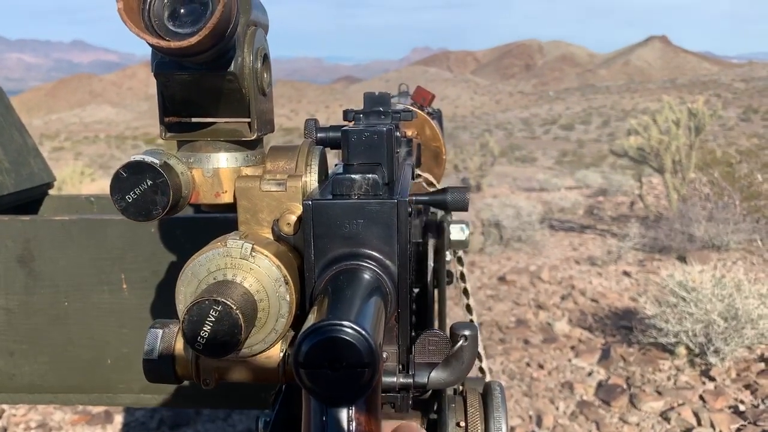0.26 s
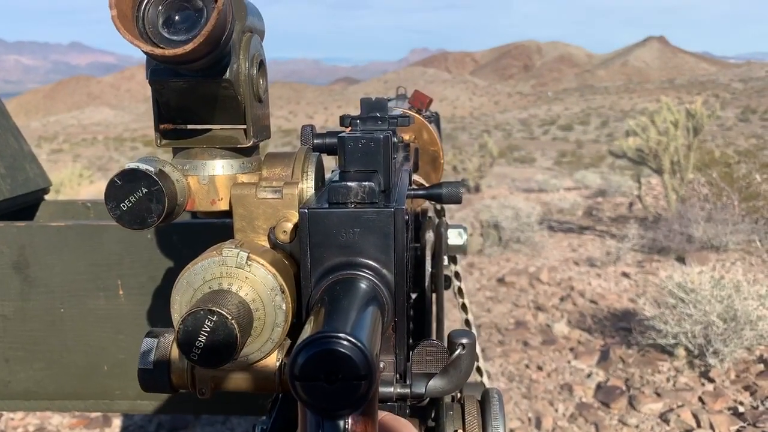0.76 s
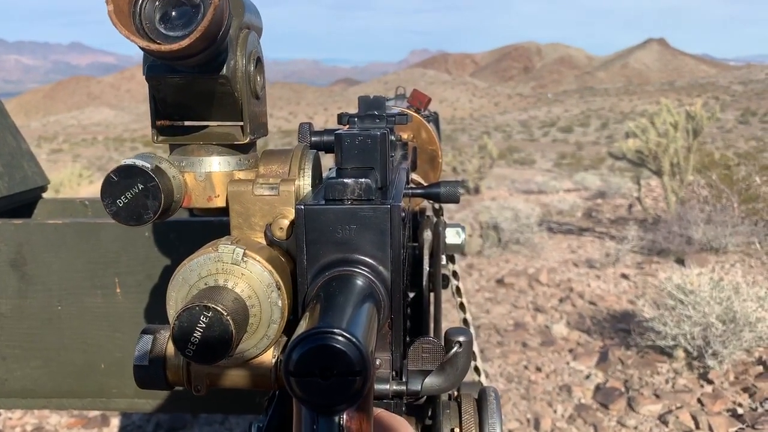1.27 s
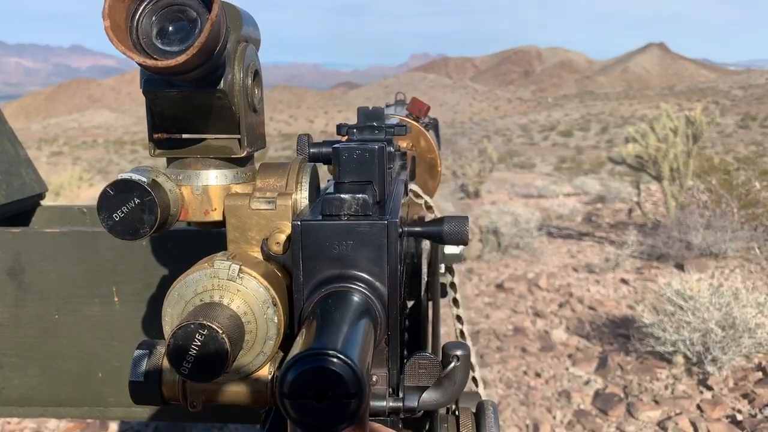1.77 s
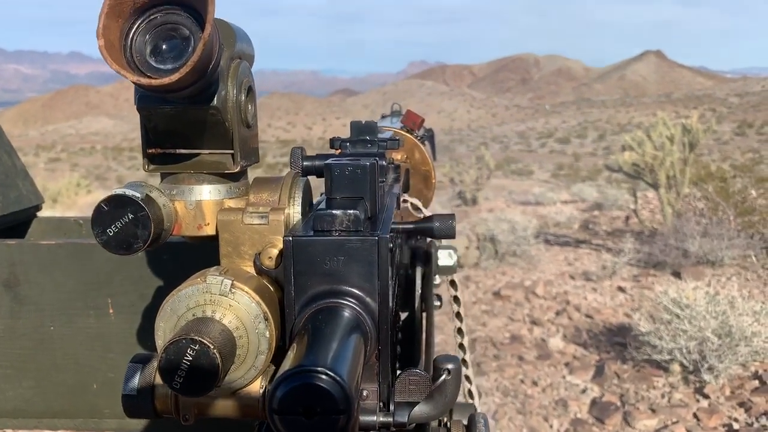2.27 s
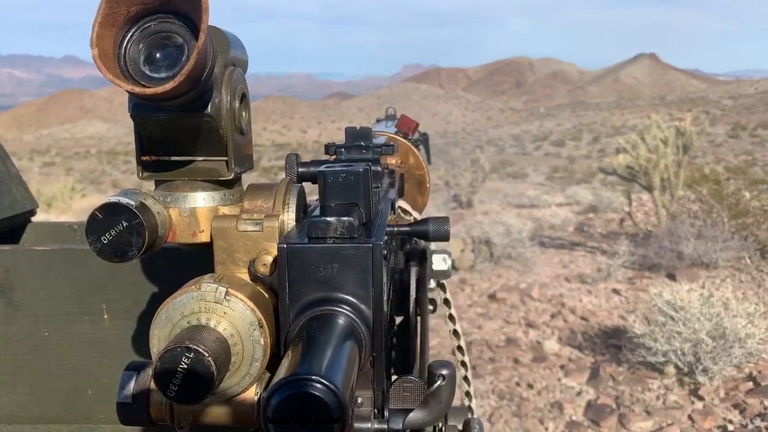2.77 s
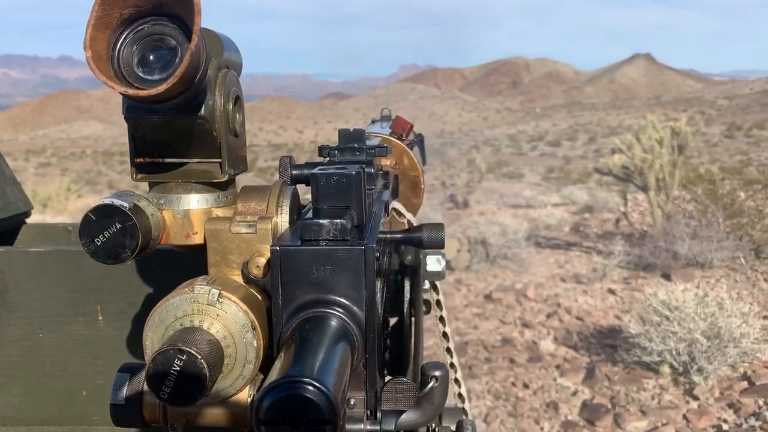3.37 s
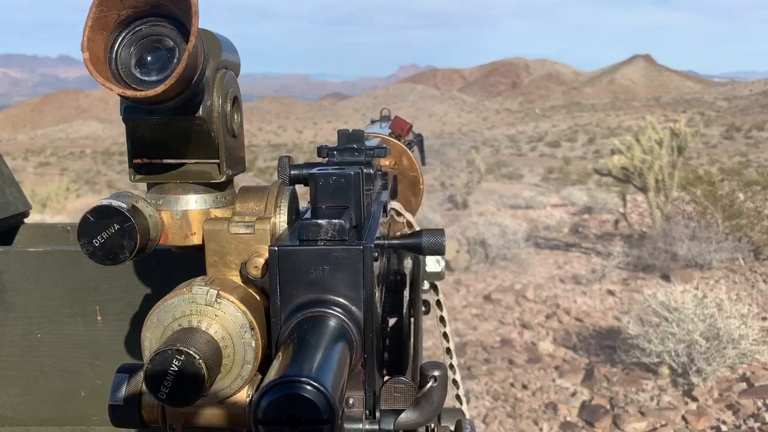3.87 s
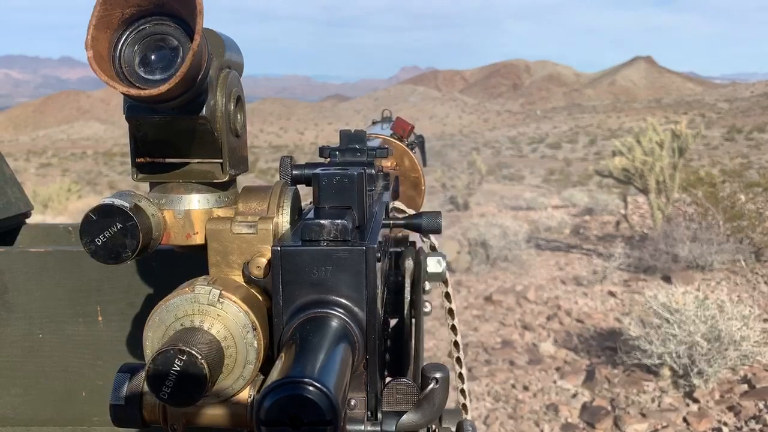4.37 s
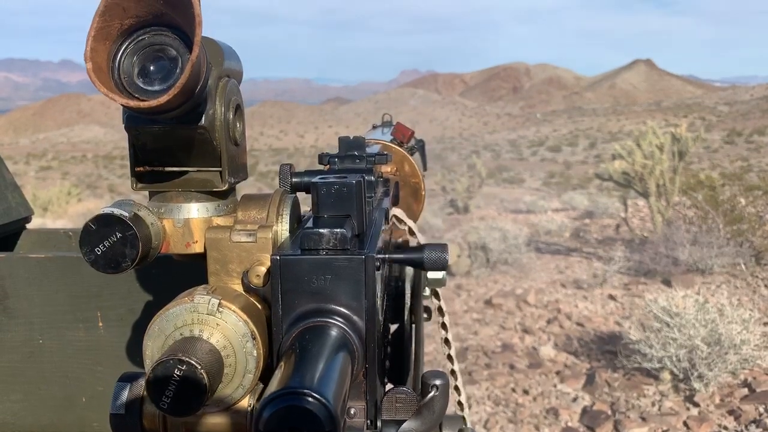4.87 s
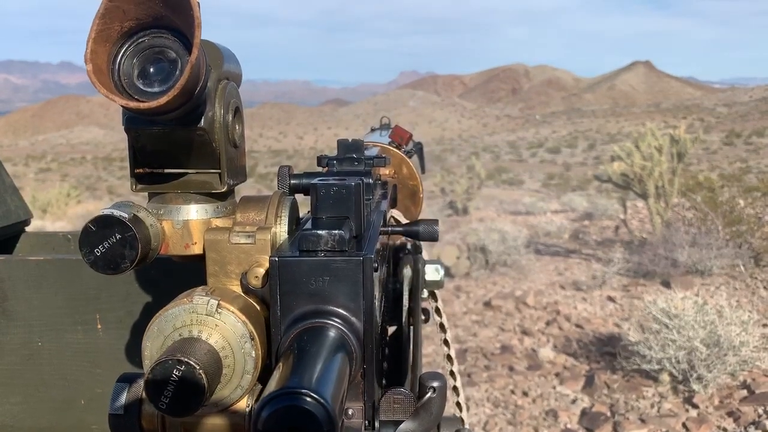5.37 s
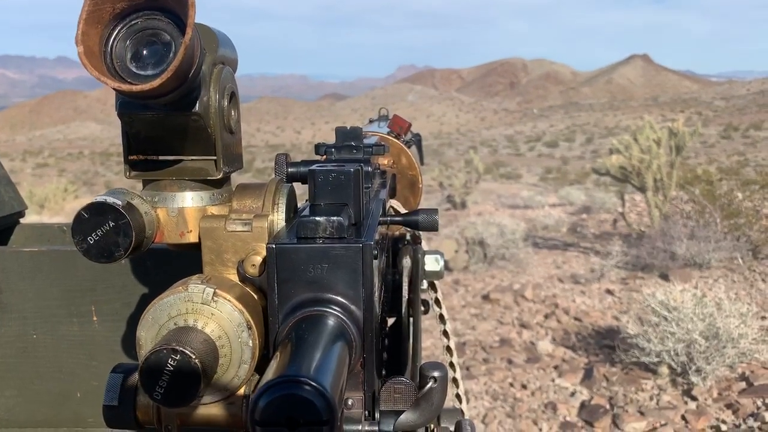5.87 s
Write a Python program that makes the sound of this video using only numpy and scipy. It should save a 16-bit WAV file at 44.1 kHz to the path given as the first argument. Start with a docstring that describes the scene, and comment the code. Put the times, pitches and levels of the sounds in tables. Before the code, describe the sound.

Right behind the breech of a belt-fed machine gun in open desert. The last shots of a short burst crack out, the bolt clacks home, and brass cases tick and ring on stones with dull knocks. Then a long steady burst of about seven shots a second hammers on with metallic action clatter and low air thumps, ending in a bolt clack, tinkling brass and a draining murmur from the hills. Close stereo microphones, peaks slightly squashed.

```python
"""Open desert, just behind the breech of a belt-fed machine gun on a mount, which fires two bursts.
Each blast is a set of dying tones and scattered noise coming back off the same surroundings.
The action clatters as shaped noise, low puffs of sinking pitch shake the microphones, and the hills murmur
back as patchy noise. Brass cases tick and ring on the stones, the bolt runs home unfired after each burst,
and dull knocks come from near the mount."""
import sys
import numpy as np
from scipy import signal
from scipy.fft import rfft, irfft, next_fast_len
from scipy.io import wavfile
from scipy.ndimage import uniform_filter1d

SR = 44100
rng = np.random.default_rng(int(sys.argv[2]) if len(sys.argv) > 2 else 0)


def magnitude_from_level(level_db):
    """Linear magnitude for a level in decibels (20 dB per decade)."""
    exponent = np.asarray(level_db, float) / 20
    return 10 ** exponent


def unload_wav(signal):
    """Save mono or channel-first audio to the path in sys.argv[1] as 16-bit WAV at rate SR, clipped to [-1, 1]."""
    wavfile.write(
        sys.argv[1],
        SR,
        np.round(np.clip(np.atleast_2d(signal).T, -1, 1) * 32767).astype(np.int16),
    )


N = 269886  # length in samples


def unit(x):
    """Scales a sound to rms 1."""
    return x / np.sqrt(np.mean(x ** 2) + 1e-20)


def along(points, hz):
    """Reads a curve of (Hz, value) points on a logarithmic pitch axis."""
    f, v = np.transpose(points)
    return np.interp(np.log(hz + 1), np.log(f + 1), v)


def filtered(x, response):
    """Multiplies the spectrum of x by a response that depends on frequency."""
    m = next_fast_len(x.shape[-1] + 8192)
    spectrum = rfft(x, m) * response(np.fft.rfftfreq(m, 1 / SR))
    return irfft(spectrum, m)[..., :x.shape[-1]]


# How alike noise is on the left and right. Each row: pitch in Hz, likeness from 0 (unrelated) to 1 (same).
LIKENESS = [(60, 0.98), (130, 0.032), (300, .65), (700, 0.062), (2000, .55), (3000, 0), (8000, 0.067)]


def hiss(count, tone):
    """Makes stereo noise of rms 1 with a given tone; the likeness of its two sides depends on pitch."""
    def turn(hz):
        return np.arccos(np.clip(along(LIKENESS, hz), 0, 1)) / 2

    def mid_and_side(hz):
        return magnitude_from_level(along(tone, hz)) * [np.cos(turn(hz)), np.sin(turn(hz))]

    mid, side = filtered(rng.standard_normal((2, count)), mid_and_side)
    return unit(np.array([mid + side, mid - side]))


def patchy(x, depth_db, size):
    """Makes the level of x uneven in random patches of time and frequency."""
    z = signal.stft(x, nperseg=size)[2]
    field = uniform_filter1d(rng.standard_normal(z.shape[1:]), size=5, axis=0)
    field = uniform_filter1d(field, size=8, axis=1)
    return signal.istft(z * magnitude_from_level(depth_db * unit(field)), nperseg=size)[1][:, :x.shape[1]]


def add(out, s, sound):
    """Mixes a sound in at second s; the buffer starts one second early."""
    at = round((s + 1) * SR)
    out[:, at:at + sound.shape[-1]] += sound


def silence():
    """Gives an empty stereo buffer with a second to spare at both ends."""
    return np.zeros((2, N + 2 * SR))


def sides(pan_db):
    """Gives left and right gains; a positive pan makes the left louder."""
    return magnitude_from_level([[pan_db / 2], [-pan_db / 2]])


def ring(t, hz, t60, attack):
    """Makes a sine from t = 0 that swells over the attack (s) and dies by 60 dB in t60 (s)."""
    t = np.maximum(t, 0)
    return magnitude_from_level(-60 * t / t60) * (1 - np.exp(-t / attack)) * np.sin(2 * np.pi * hz * t)


def scatter(tone, t60):
    """Makes dense returns as noise in which every frequency dies at its own speed."""
    hz, t, z = signal.stft(hiss(SR // 2, tone), SR, nperseg=256)
    fade = magnitude_from_level(-60 * t / along(t60, hz)[:, None])
    return signal.istft(z * fade, SR, nperseg=256)[1][:, :SR // 2]


# The shots. Each row: start in seconds, blast level in dB, base level in dB of the shot's low puffs.
SHOTS = [(-.0615, -10.5, -30), (0.0851, -12, -30.5), (0.2295, -13, -28.5), (1.5064, -11, -26),
         (1.6512, -12, -31.5), (1.7976, -12, -34), (1.9465, -11.5, -27), (2.0925, -12, -28),
         (2.2436, -11.5, -24), (2.3892, -12, -31.5), (2.535, -11.5, -38), (2.6779, -11.5, -30),
         (2.8244, -11.5, -29.5), (2.9757, -12, -28), (3.123, -11.5, -29), (3.2685, -12, -37.5),
         (3.4188, -12, -29.5), (3.5656, -12, -32.5), (3.7133, -11.5, -38.5), (3.8655, -12, -28),
         (4.014, -12, -28), (4.1639, -11, -30), (4.305, -12.5, -28), (4.451, -12, -35.5),
         (4.5985, -12, -32.5), (4.7443, -12, -30.5), (4.891, -12, -28), (5.038, -12.5, -26.5)]
# The blast and its strong returns from things nearby. Each row: delay after firing in seconds, pitch in Hz,
# time to die by 60 dB in seconds, middle level in dB relative to the blast level, left over right in dB.
RETURNS = [(.0005, 1500, 0.011, 3, 1.5), (.0012, 922, .0053, 19.5, -0.5), (.0022, 1182, 0.0079, 2, 3),
           (.0024, 2050, .0063, 16.5, -.8), (.0036, 358.5, 0.0097, 6, 0), (.004, 1615, 0.014, 3.5, 4),
           (.0098, 858.5, 0.013, 5.5, 8), (.0126, 1500, 0.0094, .7, 6), (.0151, 490, 0.038, -0.5, -5),
           (.0167, 780, .021, -5, 6.5), (.0311, 679, .038, -14, -10.5), (.0416, 604, .026, -17, -9),
           (.0518, 216, 0.033, -14, -3.5), (.079, 883, .032, -29.5, 8), (.0863, 332, 0.033, -22.5, 1.1)]
# Tone of the returns scattered close by. Each row: pitch in Hz, relative level in dB.
NEAR_TONE = [(100, -24), (200, -0.5), (500, -6.5), (1000, -0.5), (2200, -6.5), (4500, -13), (7000, -27),
             (12000, -23.5)]
# How long they last. Each row: pitch in Hz, time to die by 60 dB in seconds.
NEAR_T60 = [(150, 0.12), (1000, 0.13), (5000, 0.13)]
# Tone of the returns scattered by the open ground. Each row: pitch in Hz, relative level in dB.
GROUND_TONE = [(100, -13), (250, -2.5), (500, 5.5), (800, -1), (1200, -8.5), (1800, -18.5), (5000, -29),
               (10000, -45)]
# How long they last. Each row: pitch in Hz, time to die by 60 dB in seconds.
GROUND_T60 = [(150, 0.16), (500, 0.29), (2000, 0.11)]


def blasts():
    """The surroundings do not move, so every shot returns in nearly the same shape; return levels and part
    of the close scattered noise differ from shot to shot."""
    out, t = silence(), np.arange(SR // 2) / SR
    rise = 1 - np.exp(-t / .0012)
    fixed = magnitude_from_level(-5.5) * scatter(NEAR_TONE, NEAR_T60) + magnitude_from_level(-21) * scatter(GROUND_TONE, GROUND_T60)

    # weaker, later returns at random pitches and sides that stay fixed, with levels that vary from shot to shot
    from_s, to_s, low_hz, high_hz, late_t60 = .04, .125, 277, 1000, 0.046
    late_db, fall_db_per_s, dull_db_per_octave, pan_spread_db = -22.5, 171, 7.5, 7
    after = np.linspace(0, to_s - from_s, num=24)
    octaves = rng.permutation(np.linspace(0, np.log2(high_hz / low_hz), num=24))
    late = []
    for s, up in zip(after, octaves):
        level = late_db - fall_db_per_s * s - dull_db_per_octave * up
        late.append((from_s + s, low_hz * 2 ** up, late_t60, level, rng.normal(0, pan_spread_db)))

    for s, db, _ in SHOTS:
        strong = 0
        for delay, hz, t60, level, pan in RETURNS + late:
            varied_db = level + rng.normal(0, 1.2 + 40 * delay)  # later returns vary more
            strong = strong + sides(pan) * magnitude_from_level(varied_db) * ring(t[:SR // 4] - delay, hz, t60, attack=0.00073)
        fresh_scatter = magnitude_from_level(-7.0) * scatter(NEAR_TONE, NEAR_T60)
        add(out, s, magnitude_from_level(db) * strong)
        add(out, s, magnitude_from_level(db) * rise * (fixed + fresh_scatter))
    return out


def cycle(t, return_s):
    """Gives the gain of the action's noise, relative to the blast level, t seconds after firing."""
    lead_in_db, lead_in_db_per_s = -5.5, 1999
    roar_db, roar_sag_db_per_s, roar_s, roar_fall_db_per_s = -1, 191, .013, 1052
    dreg_db, dreg_fall_db_per_s, idle_db = -10.5, 480, -47
    return_db, return_rise_db_per_s, return_fall_db_per_s = -30, 520, 1801
    sagging = roar_db - roar_sag_db_per_s * t
    falling = roar_db - roar_sag_db_per_s * roar_s - roar_fall_db_per_s * (t - roar_s)
    roar = magnitude_from_level(np.minimum(sagging, falling))  # the gas
    dreg = (t > roar_s) * magnitude_from_level(dreg_db - dreg_fall_db_per_s * t)
    home = magnitude_from_level(return_db - np.maximum(return_rise_db_per_s * (return_s - t), return_fall_db_per_s * (t - return_s)))
    idle = (t < return_s) * magnitude_from_level(idle_db)
    after = np.sqrt(roar ** 2 + dreg ** 2 + home ** 2 + idle ** 2)
    return np.where(t < 0, magnitude_from_level(lead_in_db + lead_in_db_per_s * t), after)


# Tone of the clatter. Each row: pitch in Hz, relative level in dB.
ACTION_TONE = [(200, -13.5), (600, 0), (2000, 0), (4000, 0), (6000, -4), (9000, -6.5), (13000, -9),
               (15700, -13.5)]
# Ticks of the belt pawl. Each row: time after firing in seconds, middle level in dB.
FEED_TICKS = [(.077, -51.5), (.089, -49.5), (.097, -50.5), (.124, -52)]


def action():
    """Fresh clatter each cycle: a short swell of noise before the shot, gas, the bolt's knock at the back,
    the belt feed, the rattle of the bolt's return."""
    lead_in_s, return_s = .026, .14
    back_s, back_db, back_spread_db, back_t60 = .034, -23.5, 0.5, 0.024  # the knock at the back
    out, t, before = silence(), np.arange(-lead_in_s, return_s + .012, 1 / SR), -.2
    for s, db, _ in SHOTS:
        weaker = (s - before > .3) & (t < -.0045)  # the swell is weaker at the start of a burst
        late = t - back_s - rng.normal(0, 0.0014)
        knock = (late > 0) * magnitude_from_level(rng.normal(back_db, back_spread_db) - 60 * np.abs(late) / back_t60)
        shape = magnitude_from_level(db - 6.2 * weaker) * cycle(t, return_s) + knock
        contacts = unit(uniform_filter1d(rng.standard_normal(len(t)), size=110))
        rattle = magnitude_from_level(2.1 * contacts)  # many small contacts
        feed = 0
        for at, tick_db in FEED_TICKS:
            feed = feed + (t > at) * magnitude_from_level(tick_db + rng.normal(0, 2.1) - 60 * np.abs(t - at) / 0.033)
        pawl = feed * hiss(len(t), [(1500, -22.0), (3200, 4), (4600, 2.5), (6500, -25.0)])
        clatter = patchy(hiss(len(t), ACTION_TONE), depth_db=2.0, size=128)
        add(out, s - lead_in_s, shape * rattle * clatter + pawl)
        before = s
    return out


def lump(hz, halves_s, rise_s, fall_s):
    """A round lump of air, peak at .04 s, whose pitch halves every halves_s; one port gets it first."""
    port_lag_s = .0004  # typical size
    t = np.arange(-.04, .05, 1 / SR) + rng.normal(0, port_lag_s) * np.array([[1], [-1]])
    cycles = hz * rng.uniform(0.85, 1.12) * halves_s / np.log(2) * (1 - 2 ** (-t / halves_s))
    swell = np.exp(-(t / np.where(t < 0, rise_s, fall_s)) ** 2)
    return rng.choice([-1, 1]) * sides(rng.normal(0, 2.8)) * swell * np.cos(2 * np.pi * cycles)


# Later low puffs. Each row: time of the peak in seconds, peak level in dB.
LATER_PUFFS = [(.009, -30), (.054, -30.5), (1.576, -30), (1.707, -24), (1.756, -37), (1.847, -27),
               (2.014, -28), (2.148, -25.5), (2.315, -25.5), (2.369, -26), (2.462, -21.5), (2.582, -31.5),
               (3.046, -23.5), (3.098, -27), (3.941, -23), (3.997, -26.5), (4.665, -30), (4.808, -23.5),
               (4.945, -23.5), (5.112, -22.5), (5.163, -28.5)]
# Tone of the ragged puffs. Each row: pitch in Hz, relative level in dB.
PUFF_TONE = [(25, -23.5), (50, -3), (80, 1.5), (130, -3.5), (200, -12), (350, -44.5)]


def puffs():
    """Low lumps of air on the microphones: a ragged and a round one with each shot, and round ones later."""
    out, count = silence(), round(.036 * SR)
    ragged_db, thump_db, thump_s = -4, 6, .014  # both levels relative to the shot's base puff level
    for s, _, db in SHOTS:
        ragged = unit(np.hanning(count) * hiss(count + SR // 10, PUFF_TONE)[:, -count:])
        add(out, s + 0.0014, magnitude_from_level(db + ragged_db) * ragged)
        thump = lump(hz=122, halves_s=0.011, rise_s=.007, fall_s=0.014)
        add(out, s + thump_s - .04, magnitude_from_level(db + thump_db) * thump)
    for s, db in LATER_PUFFS:
        add(out, s - .04, magnitude_from_level(db) * lump(hz=74, halves_s=0.015, rise_s=0.0087, fall_s=0.019))
    return out


# Tone of the body of the murmur. Each row: pitch in Hz, relative level in dB.
HILL_BODY = [(15, -34), (30, -20.5), (60, -6.5), (110, -5.5), (280, -7.5), (400, -14), (600, -18),
             (900, -22), (1300, -18), (1650, -18.5), (1900, -11.5), (2200, -17), (2900, -19), (4500, -42.5),
             (7000, -72)]
# Tone of its treble, which drops fast. Each row: pitch in Hz, relative level in dB.
HILL_TREBLE = [(1500, -16), (3000, -2), (4500, 1), (6500, -5), (9000, -15.5), (11500, -31.5)]
# Tone of the treble that lingers. Each row: pitch in Hz, relative level in dB.
HILL_LAST = [(1500, -16), (3000, -0.5), (4200, 0.5), (5000, -11.5), (7500, -18.5), (9000, -32)]


def hills():
    """A patchy murmur of noise in three layers that drains away after each shot, the treble first."""
    now, fired = np.arange(N) / SR, np.array(SHOTS)[:, 0]
    since = now - fired[np.searchsorted(fired + .05, now) - 1]  # seconds since the last shot whose echo is back
    murmur = 0
    # level in dB at since = 0, drain in dB per second, tone
    for db, drain, tone in [(-57, 7.5, HILL_BODY), (-64.5, 48.5, HILL_TREBLE), (-69, 13.5, HILL_LAST)]:
        murmur = murmur + magnitude_from_level(db - drain * since) * hiss(N, tone)
    return patchy(murmur, depth_db=2.0, size=512)


# Cases striking stone. Each row: start in seconds, tick level in dB, ring pitch in Hz, ring level in dB.
CASES = [(.4459, -48.5, 13200, -64.5), (.4997, -56.5, 13000, -65), (.601, -43.5, 12950, -52.5),
         (.615, -41, 13000, -44), (.7427, -59, 13350, -68.5), (.8272, -56, 12800, -54.5),
         (.841, -41.5, 13200, -51.5), (.8478, -46, 13430, -46), (.9303, -58.5, 12920, -59.5),
         (1.1414, -66.5, 12500, -60), (1.1483, -63, 12600, -67), (1.1717, -66, 13300, -53),
         (1.3194, -64, 12450, -76), (5.2085, -46, 13560, -47.5), (5.2208, -51.5, 13390, -62),
         (5.2552, -43, 12900, -59), (5.2964, -72, 12600, -64), (5.3278, -61, 12790, -56),
         (5.4235, -59.5, 13000, -72), (5.5417, -60, 12700, -59), (5.5552, -51, 13000, -47),
         (5.662, -64, 12960, -65), (5.6781, -62, 12780, -66), (5.6939, -57, 13300, -58),
         (5.7354, -57.5, 12800, -57.5), (5.7617, -49.5, 13380, -72.5), (5.78, -61, 13070, -62),
         (5.7859, -55, 13450, -65), (5.8845, -61, 13500, -70), (5.9304, -54.5, 13500, -71.5)]
# The tones in a case's ring. Each row: pitch as a multiple of the ring pitch, middle level in dB relative
# to the ring level, share of the ring's dying time.
BRASS = [(1, -3, 1), (.982, -9, 1.1), (.962, -14, .6), (.925, -10.5, .4), (1.04, -23, .45)]
# Tone of the tick. Each row: pitch in Hz, relative level in dB.
TICK_TONE = [(1500, -27.5), (4000, 2), (6500, 2.5), (10000, -4), (15700, -14)]


def cases():
    """Brass ticks on stone and sings near 13 kHz; faint hops and the falls under the firing are random."""
    out, t = silence(), np.arange(SR // 3) / SR
    seen = np.column_stack([CASES, np.full(len(CASES), .11)])  # last column: t60 in seconds

    # each strike hops once more, .012 to .072 s later and 21 to 29 dB fainter
    luck = rng.random((len(seen), 2))
    hops = seen + np.outer(.012 + .06 * luck[:, 0], [1, 0, 0, 0, 0])
    hops = hops - np.outer(21 + 8 * luck[:, 1], [0, 1, 0, 1, 0])

    fired = np.array(SHOTS)[:, :1]
    draw = rng.random((len(fired), 4, 4))  # four bounces a case
    force_db = -16 * draw[..., 1]
    hidden = np.stack([fired + 0.02 + 0.12 * draw[..., 0], force_db - 49.5, 12600 + 900 * draw[..., 2],
                       force_db - 47, .04 + .09 * draw[..., 3]], axis=-1)

    for s, tick_db, hz, ring_db, t60 in [*seen, *hops, *hidden.reshape(-1, 5)]:
        song = 0
        for ratio, level, share in BRASS:
            song = song + magnitude_from_level(level + rng.normal(0, 3)) * ring(t, hz * ratio, t60 * share, attack=.0005)
        song *= magnitude_from_level(3 * np.sin(2 * np.pi * (rng.uniform(25, 70) * t + rng.random())))  # the case spins as it rings
        song *= 1 + 1.2 * np.exp(-t / .004)  # stronger around the moment of contact
        tick = magnitude_from_level(-60 * t[:2000] / 0.0079) * hiss(2000, TICK_TONE)
        add(out, s, magnitude_from_level(ring_db) * song[None])
        add(out, s, sides(1.5) * magnitude_from_level(tick_db) * tick)
    return out


# The bolt runs home unfired. Each row: landing in seconds, ring level in dB, left over right in dB,
# harshness in dB added to the cracks.
CATCH = [(0.3772, -23.5, -2.5, -2), (5.177, -28, 1, 4.5)]
# Its contacts. Each row: seconds from the landing, level in dB relative to the ring level,
# crack level in dB before the harshness is added.
SETTLE = [(-.024, -16.5, -2.5), (-.0088, -12.5, -0.5), (0, 0.5, -8), (.0118, -18.5, 3)]
# The ring of the receiver. Each row: pitch in Hz, middle level in dB, time to die by 60 dB in seconds.
STEEL = [(1359, -10, 0.021), (1500, -3, 0.014), (2110, -2.5, 0.012), (2980, -17.5, 0.045),
         (4130, -19, 0.017), (5900, -17.5, 0.04), (8030, -7, 0.017)]
# Tone of the crack. Each row: pitch in Hz, relative level in dB.
CRACK_TONE = [(500, -13.5), (1500, 1.5), (4000, -2), (8000, -3), (13000, -3), (15700, -8.5)]


def catch():
    """The bolt lands without a shot: a crack and the ring of the receiver at each contact."""
    out, t = silence(), np.arange(SR // 8) / SR
    rise = 1 - np.exp(-t / 0.00084)
    for s, db, pan, harsh_db in CATCH:
        for after, contact_db, crack_db in SETTLE:
            steel = 0
            for hz, level, t60 in STEEL:
                steel = steel + magnitude_from_level(level + rng.normal(0, 3.3)) * ring(t, hz, t60, attack=.0004)
            crack = magnitude_from_level(-60 * t / 0.032) * rise * patchy(hiss(len(t), CRACK_TONE), depth_db=5.0, size=128)
            contact = magnitude_from_level(crack_db + harsh_db) * crack + steel
            add(out, s + after, sides(pan) * magnitude_from_level(db + contact_db) * contact)
    return out


# Dull knocks. Each row: start in seconds, burst level in dB, thump level in dB, ping level in dB.
KNOCKS = [(.634, -44.5, -34, -47.5), (.8, -56.5, -69, -74), (1.124, -47.5, -63, -68),
          (1.227, -47, -48, -73), (1.407, -53, -60, -80), (5.386, -66, -41.5, -68.5),
          (5.478, -56.5, -50, -71), (5.616, -52, -60, -65), (5.92, -64, -64, -74.5)]
# Tone of the burst. Each row: pitch in Hz, relative level in dB.
KNOCK_TONE = [(400, -19.5), (800, -1.5), (1300, 5), (2200, -3.5), (3700, -22), (5000, -43)]


def knocks():
    """Soft contacts near the mount, a little to the right: a dull burst, a low thump and a ping of metal, often faint."""
    out, t = silence(), np.arange(SR // 8) / SR
    for s, db, thump_db, ping_db in KNOCKS:
        burst = magnitude_from_level(db - 60 * t / 0.036) * (1 - np.exp(-t / 0.00055)) * hiss(len(t), KNOCK_TONE)
        ping = magnitude_from_level(ping_db) * ring(t, hz=3780, t60=0.025, attack=.0005)
        thump = magnitude_from_level(thump_db) * ring(t, hz=250, t60=0.03, attack=0.0013)
        add(out, s, sides(-1.5) * (burst + ping + thump))
    return out


def scene():
    """Adds up everything that reaches the two microphones."""
    events = blasts() + action() + puffs() + cases() + catch() + knocks()
    return events[:, SR:SR + N] + hills()


def roll_off(x):
    """The treble ends steeply here."""
    return signal.sosfilt(signal.butter(12, 15800, fs=SR, output="sos"), x)


# Balance of the microphones. Each row: pitch in Hz, left over right in dB.
LEAN = [(60, 1), (150, 0.5), (300, 0.5), (500, 0.5), (950, 0.5), (2380, 0.5), (5980, -4), (15000, 1.5)]
# What the right channel takes from the left capsule. Each row: pitch in Hz, share from 0 to 1.
SHARED = [(7500, 0.17), (9500, 0.44), (11500, 0.99), (16000, 0.87)]


def record(dry):
    """The right channel takes a share of the left capsule, most in the top treble, about .3 ms early; peaks round off."""
    in_phase_hz, turn_hz = 10200, 3300  # the phase lead is zero here, and gains a full turn over this span

    def share(hz):
        return np.clip(along(SHARED, hz), 0, 1)

    early = filtered(dry[0], lambda hz: share(hz) * np.exp(2j * np.pi * (hz - in_phase_hz) / turn_hz))
    right = early + filtered(dry[1], lambda hz: np.sqrt(1 - share(hz) ** 2))
    x = filtered(np.array([dry[0], right]), lambda hz: magnitude_from_level(along(LEAN, hz) * np.array([[.5], [-.5]])))
    x = x / (1 + np.abs(x / 0.76) ** 6) ** (1 / 6)  # peaks stay below 0.76
    # the treble ends at 15.9 kHz and the bass thins out below about 32 Hz
    x = filtered(x, lambda hz: np.clip((15900 - hz) / 250, 0, 1) * hz ** 2 / (hz ** 2 + 32 ** 2))
    return roll_off(x)


dry = scene()
out = record(dry)
unload_wav(out)
```